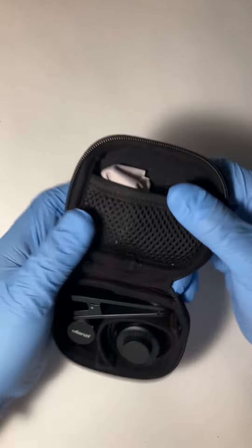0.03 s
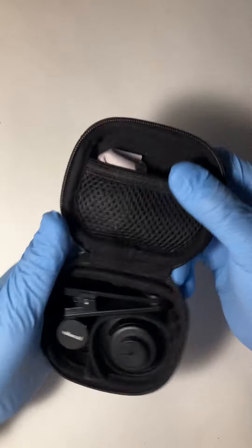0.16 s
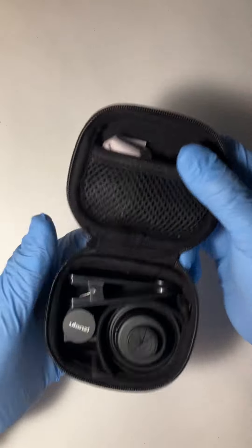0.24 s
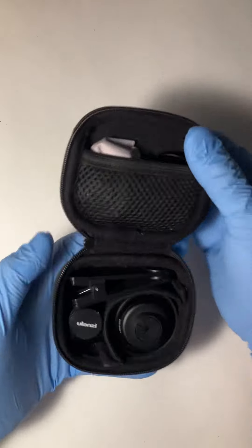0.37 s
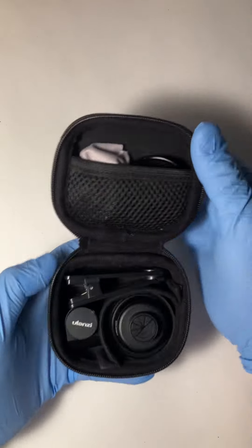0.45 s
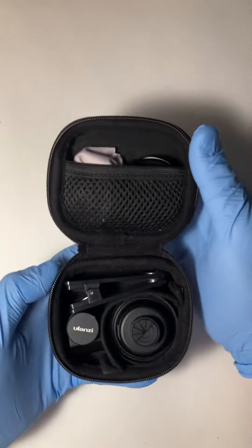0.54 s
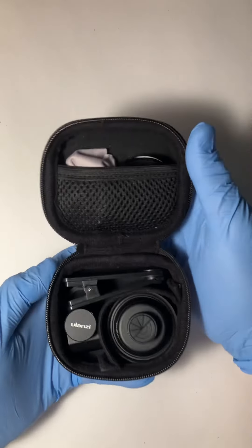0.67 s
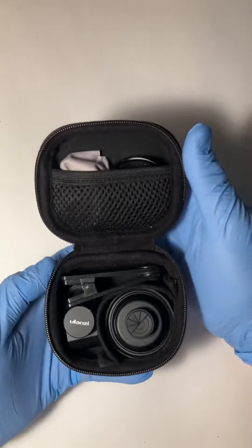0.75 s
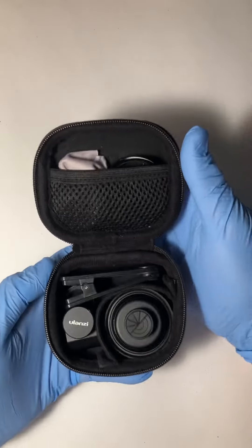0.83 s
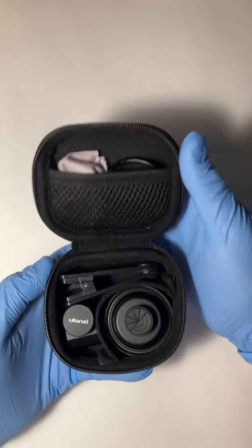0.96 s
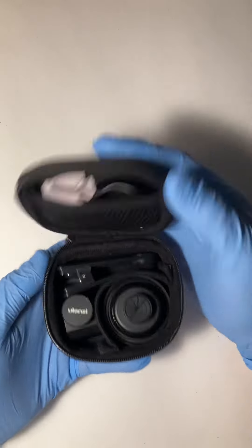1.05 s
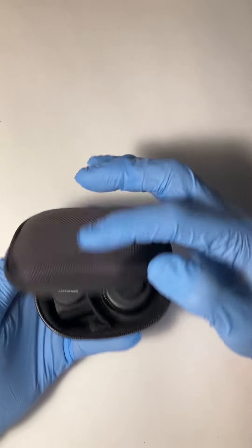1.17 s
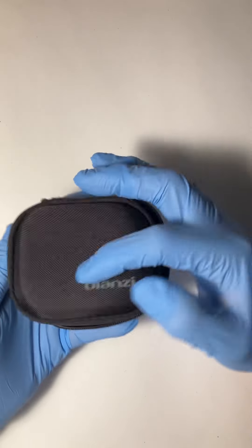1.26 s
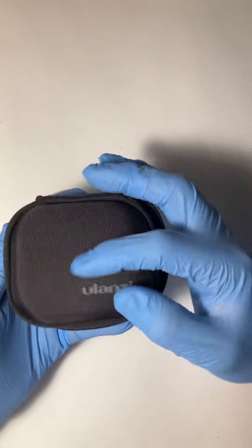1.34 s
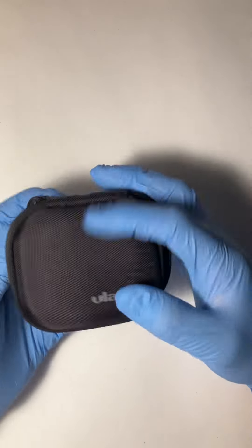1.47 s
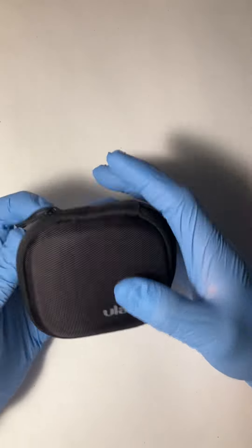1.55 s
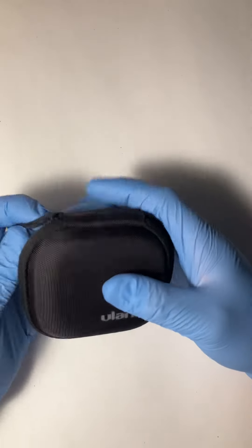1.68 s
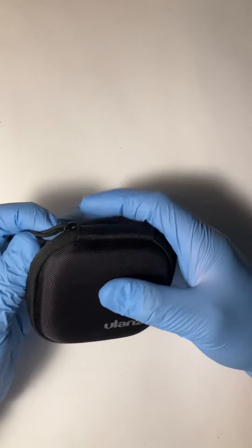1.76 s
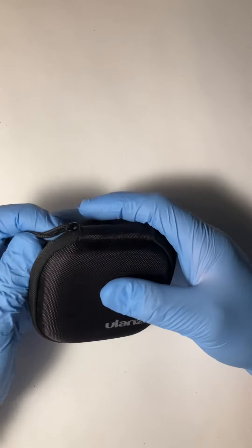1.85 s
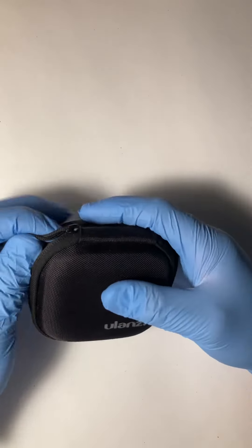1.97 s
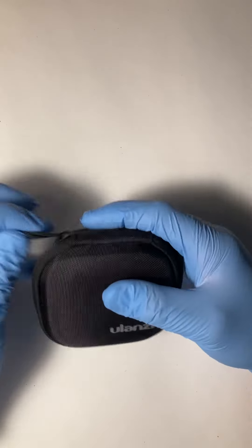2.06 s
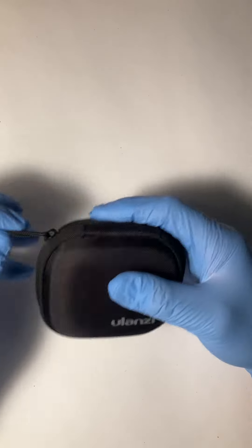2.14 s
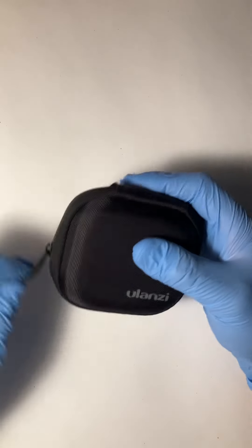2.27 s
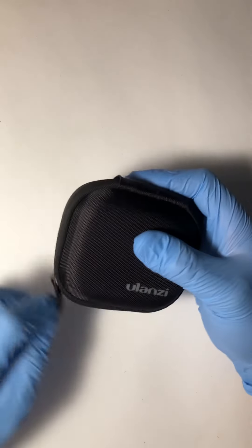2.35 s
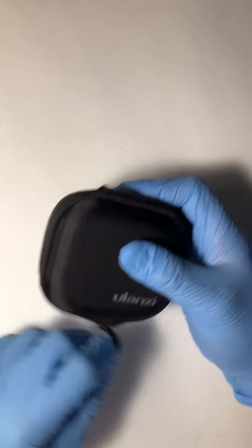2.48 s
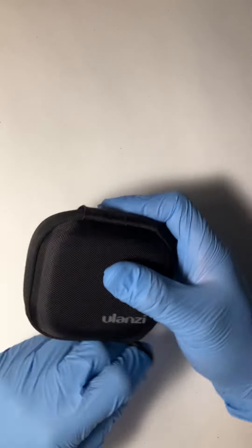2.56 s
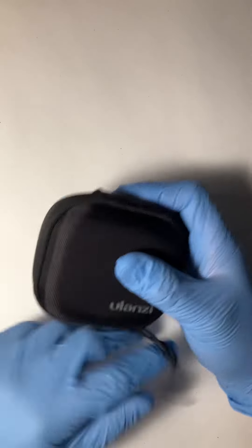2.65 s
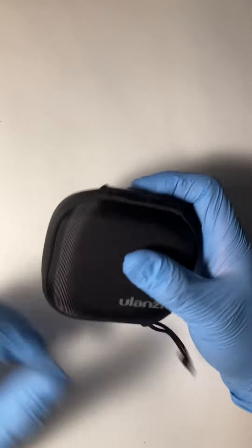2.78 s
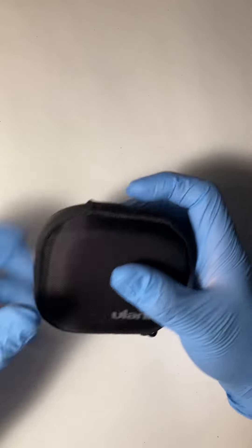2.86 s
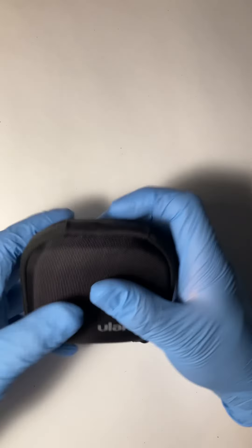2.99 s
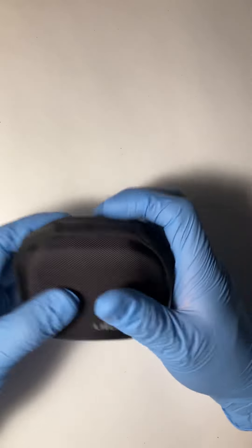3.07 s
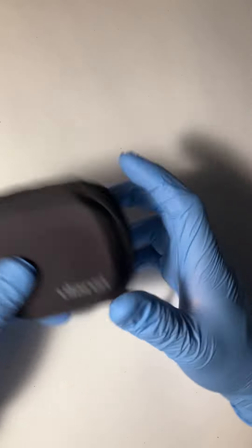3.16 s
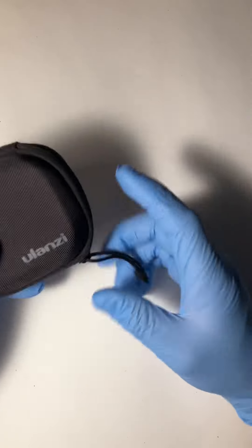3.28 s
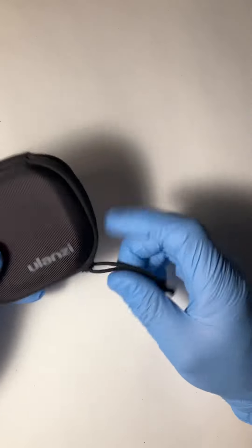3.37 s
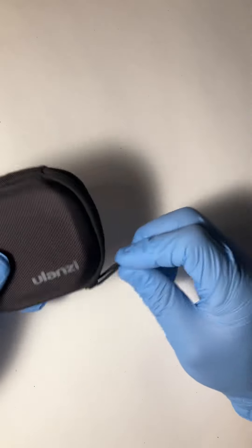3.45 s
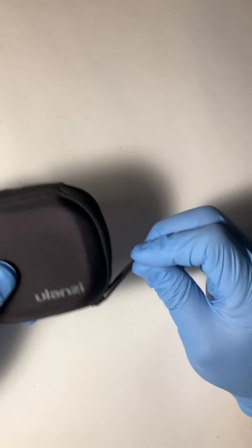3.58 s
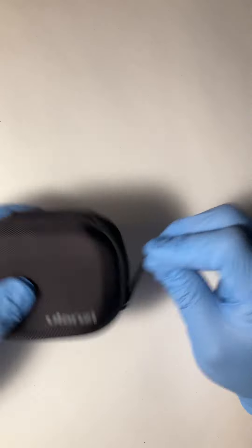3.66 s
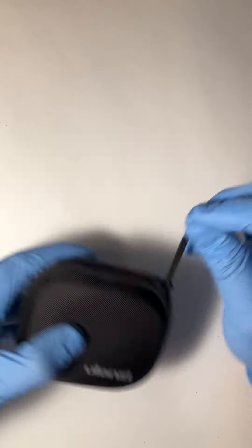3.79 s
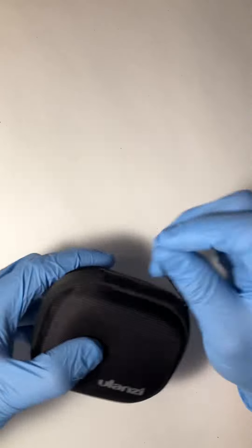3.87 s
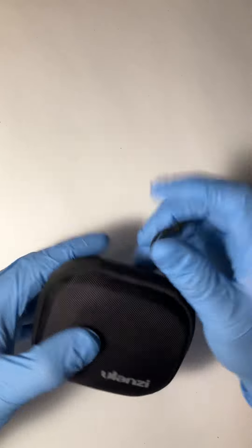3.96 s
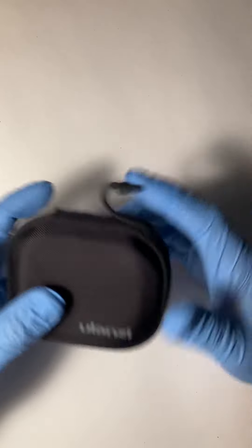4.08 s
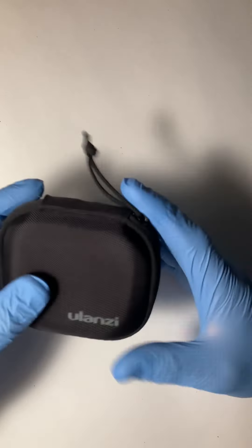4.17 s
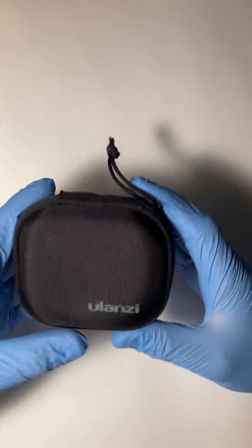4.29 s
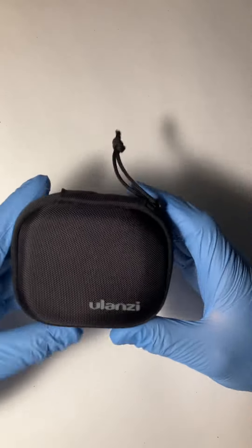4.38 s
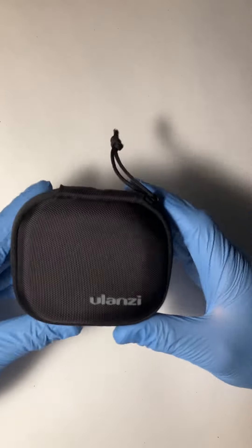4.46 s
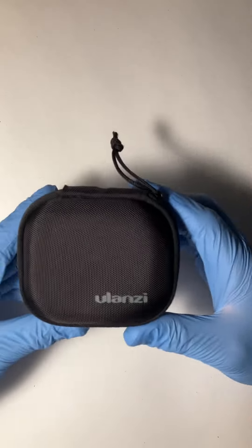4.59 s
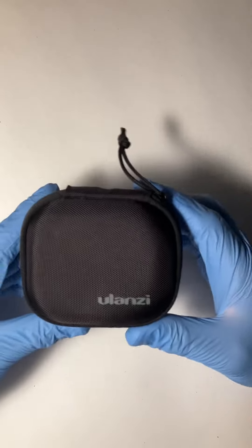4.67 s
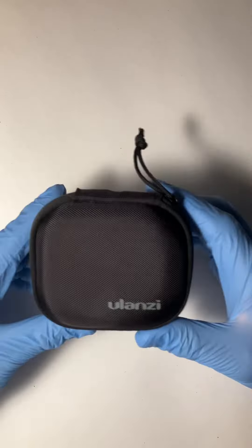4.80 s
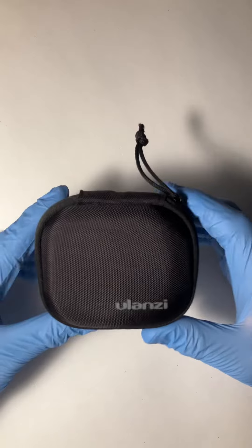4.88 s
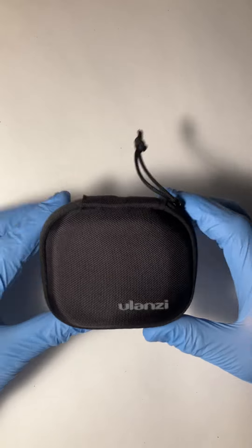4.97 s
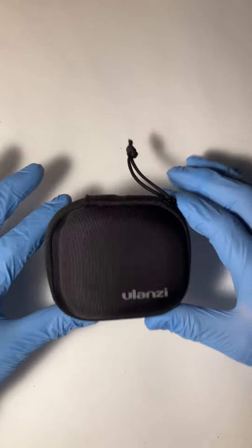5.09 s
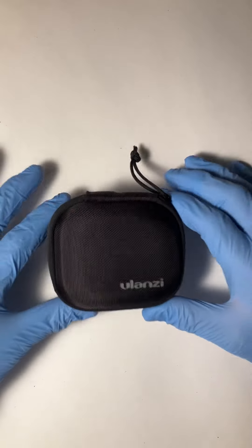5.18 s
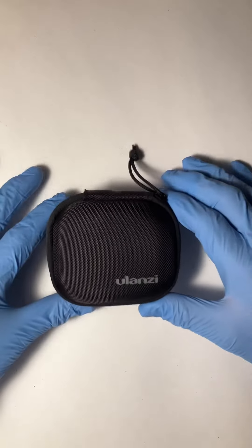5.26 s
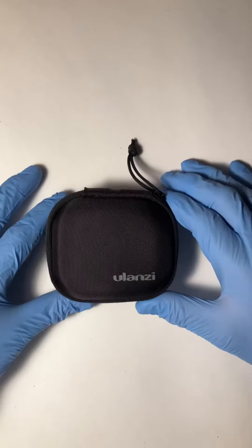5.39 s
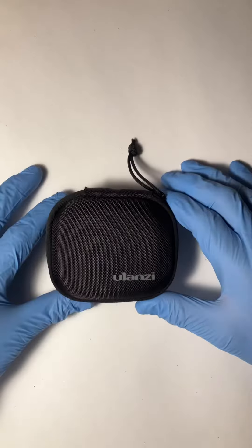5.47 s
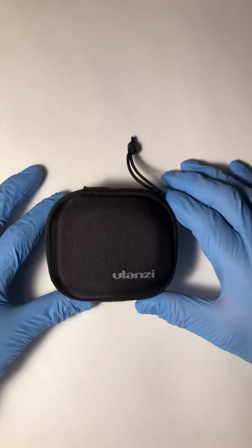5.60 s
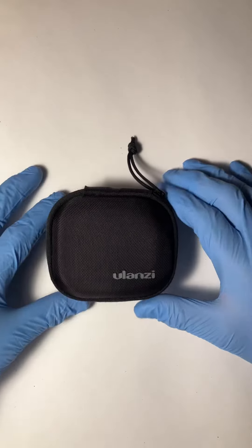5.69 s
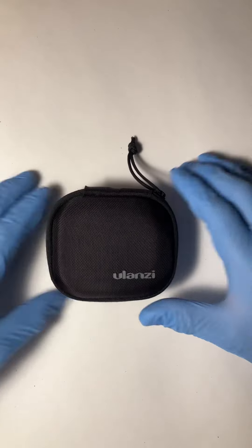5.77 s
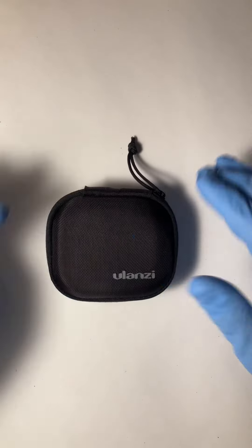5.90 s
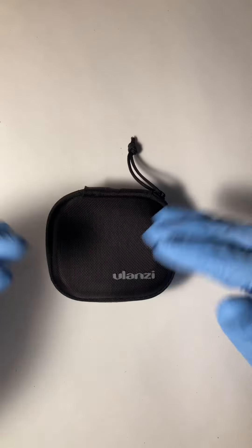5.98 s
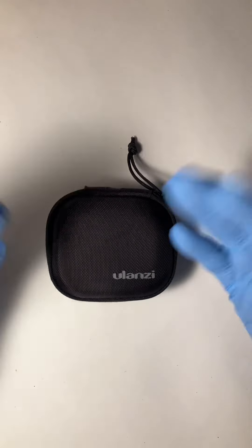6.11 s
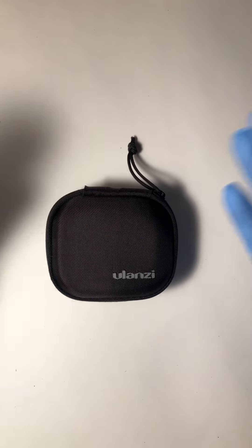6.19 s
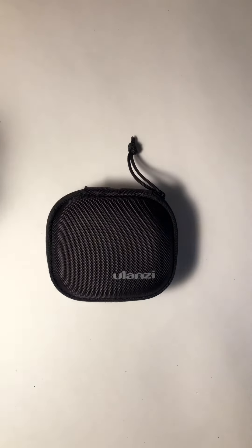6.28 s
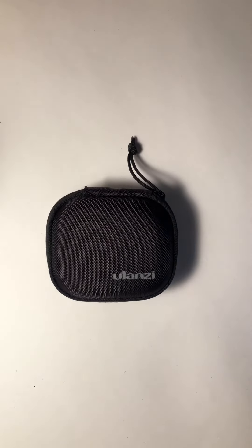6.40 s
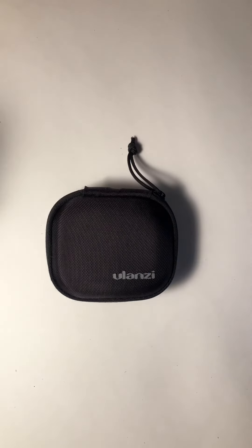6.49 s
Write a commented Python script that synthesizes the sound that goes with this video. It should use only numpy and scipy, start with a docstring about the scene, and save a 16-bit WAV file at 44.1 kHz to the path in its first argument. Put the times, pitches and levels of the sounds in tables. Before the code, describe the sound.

Stereo close microphones catch gloved fingers sliding on woven fabric, with crackles and tiny snaps. A zipper starts tooth by tooth and speeds into a hollow buzz; after a pause for handling, a faster burst and rattling tug finish the closing. The case then lands softly on a table. Low room rumble and a short diffuse echo surround it.

```python
"""A zipper on a small hard-shell fabric case: two pulls and a tug, each tooth clicking into the shell.
Gloved hands, heard as filtered friction, ticks and soft bumps, fold the case shut before the zipper
and set it on a table after it; that contact rings damped modes of case and table top.
Close by in a small room with a low rumble, through two microphone ports with a short diffuse echo."""
import sys
import numpy as np
from scipy import signal
from scipy.fft import rfft, irfft, next_fast_len
from scipy.io import wavfile

SR = 44100
rng = np.random.default_rng(int(sys.argv[2]) if len(sys.argv) > 2 else 0)


def transcribe(u):
    """Save the signal u as a 16-bit wav file named by the first command-line argument.

    u: samples, shape (n,) or (channels, n), limited to [-1, 1]; the rate is SR.
    q: integer samples, one column per channel.
    """
    v = np.clip(np.atleast_2d(u).T, -1, 1)
    q = np.round(v * 32767).astype(np.int16)
    wavfile.write(sys.argv[1], SR, q)


N = 288414
TIME = np.arange(N) / SR

# resonances of the shell: (f/Hz, width/Hz, lift/dB)
SHELL_MODES = [(481, 32, 6), (597, 7.9, 3.5), (694, 49, 1), (760, 90, 3.5), (925, 22, 3), (960, 31, 0.5),
               (1120, 15, 7), (1596, 110, 9.5), (1790, 98, 4.5), (2152, 180, 7), (2680, 89, 3),
               (3100, 210, -0.5), (4630, 500, 7.5)]
# resonances of the stiff rim that carries the teeth: (f/Hz, width/Hz, lift/dB)
RIM_MODES = [(1210, 73, 6.5), (1880, 240, 13.5), (3020, 520, 0), (4300, 620, 6.5)]
# broad colour of a single tooth or glove tick: (f/Hz, relative level per Hz/dB)
TICK_COLOUR = [(100, -14.5), (400, -17), (750, -1), (1250, -8.5), (1850, -12.5), (2450, -13.5), (3100, -8),
               (4200, -19), (5500, -19), (10000, -22.5), (15500, -25.5)]
# spectrum of a glove sliding on the weave: (f/Hz, relative level per Hz/dB)
SLIDING_COLOUR = [(800, -21), (2500, -10.5), (4000, -3.5), (5000, -4), (6800, -1), (9500, -1.25),
                  (13000, -4.5), (15800, -9)]

# length of the friction burst behind a slow tooth or a tooth of the long pull
TOOTH_GRIT_S = .0012


def from_db(db):
    """Decibels to gain."""
    return 10 ** (np.asarray(db) / 20)


def rms_one(x):
    """Scale to unit power."""
    return x / np.sqrt(np.mean(x ** 2) + 1e-20)


def at_hz(points, hz):
    """Read a table on a log-frequency axis."""
    known_hz, values = np.transpose(points)
    return np.interp(np.log(np.maximum(hz, 1)), np.log(known_hz), values)


def response(points, resonances=(), size=4096):
    """Causal minimum-phase impulse response of a broad spectrum with resonant peaks on it."""
    hz = np.arange(size // 2 + 1) * SR / size
    db = at_hz(points, hz)
    for centre, width, lift in resonances:
        db = db + lift / (1 + (2 * (hz - centre) / width) ** 2)
    cepstrum = irfft(np.log(from_db(db)))[:size // 2]
    cepstrum[0] /= 2
    return irfft(np.exp(rfft(2 * cepstrum, size)))[:size // 2]


def colour(x, points, resonances=()):
    """Filter so that a white input keeps its power."""
    h = response(points, resonances)
    return signal.oaconvolve(x, h / np.linalg.norm(h))[:N]


def drift(rate):
    """Smooth chance with spread 1, changing about rate times a second."""
    knots = rng.standard_normal(N // 8)
    return rms_one(np.interp(TIME * rate, np.arange(len(knots)), knots))


def curve(rows):
    """Each column of a table of (t/s, value, ..) joined by straight lines over time."""
    s, *columns = np.transpose(rows)
    return [np.interp(TIME, s, column) for column in columns]


def held(start, end, fade_s):
    """Full from start to end, fading quickly outside."""
    outside = np.maximum(start - TIME, 0) + np.maximum(TIME - end, 0)
    return np.exp(-np.minimum(outside / fade_s, 10) ** 2)


def swells(rows):
    """Rounded swells from rows of (peak t/s, half length/s, height), summed in power."""
    roundness, linger = 1.4, 0.99  # linger below 1: a swell dies a little faster than it grows
    power = np.zeros(N)
    for s, half_s, height in rows:
        near = slice(max(0, int((s - 5 * half_s) * SR)), int((s + 5 * half_s) * SR))
        age = (TIME[near] - s) / half_s
        distance = np.maximum(age / linger, -age * linger)
        power[near] += (height * np.exp(-distance ** roundness)) ** 2
    return np.sqrt(power)


def wander(x, depth_db, rate, lowest_hz=400):
    """As fingers or slider move over the shell, bands half an octave wide come and go on their own.

    All below lowest_hz moves as one band; what lies above the last edge stays steady.
    """
    size = next_fast_len(N)
    out, rest = 0, rfft(x, size)
    hz = np.linspace(0, SR / 2, len(rest))
    for edge in lowest_hz * np.sqrt(2) ** np.arange(8):
        low = rest / (1 + (hz / edge) ** 10)
        out = out + irfft(low, size)[:N] * from_db(depth_db * drift(rate))
        rest = rest - low
    return out + irfft(rest, size)[:N]


def gritty(clicks, grit, seconds):
    """Each click drags a short burst of friction noise behind it; the mean energy stays the same."""
    r = np.exp(-1 / (seconds * SR))
    burst = np.sqrt(signal.lfilter([1 - r], [1, -r], clicks ** 2 + 1e-24))
    return (clicks + grit * burst * rng.standard_normal(N)) / np.hypot(1, grit)


def friction(per_s, spread_db, smooth, flutter_db):
    """Threads catch and let go: dense slips of uneven size over a smooth hiss."""
    sizes = from_db(spread_db * np.clip(rng.standard_normal(N), -2, 2))
    slips = (rng.random(N) < per_s / SR) * rng.standard_normal(N) * sizes
    rough = rms_one(slips) + smooth * rng.standard_normal(N)
    return rms_one(rough * from_db(flutter_db * drift(110)))


def background(rumble_db, air_db):
    """Room rumble, about half of its power common to both ports, and a faint steady hiss in each."""
    # rumble over time: (t/s, relative level/dB)
    rumble_level = [(0, -76), (.5, -67.5), (.75, -61.5), (1.2, -65), (1.55, -60.5), (2.5, -57), (2.85, -71),
                    (3.0, -59.5), (3.25, -67), (3.8, -57.5), (4.6, -71.5), (5.2, -63.5), (5.8, -60.5),
                    (6.54, -63)]
    # rumble spectrum: (f/Hz, relative level per Hz/dB)
    rumble_colour = [(20, -35), (35, 3), (52, 9.5), (80, -1), (110, -5.5), (140, -9.5), (200, -21.5),
                     (300, -32), (600, -57.5), (2000, -72.5)]
    # hiss spectrum: (f/Hz, relative level per Hz/dB)
    air_colour = [(100, 19.5), (400, 6), (1000, -0.5), (3000, -5.5), (8000, -12), (15000, -18)]
    apart = 0.97  # each port's own rumble relative to the common one
    whites = rng.standard_normal(N) + apart * rng.standard_normal((2, N))
    rumble = np.array([colour(white, rumble_colour) for white in whites])
    rumble = rumble * from_db(rumble_db + curve(rumble_level)[0])
    air = np.array([colour(white, air_colour) for white in rng.standard_normal((2, N))])
    return rumble + from_db(air_db) * air


def touch():
    """Strength of hiss and of rub over time: the creep of the holding hands with the strokes on top."""
    # gloves hold the case and creep on it: (start t/s, end t/s, relative hiss/dB, relative rub/dB)
    holds = [(0, 0.735, -78.5, -72.5), (0.947, 1.706, -71.5, -64), (1.846, 2.563, -70, -57),
             (2.607, 3.097, -74, -65.5), (3.107, 3.314, -82.5, -74), (3.292, 5.043, -76.5, -74),
             (5.103, 5.268, -81.5, -80), (5.663, 6.161, -74.5, -78.5)]
    # a finger strokes the case: (peak t/s, half length/s, relative hiss/dB, relative rub/dB)
    strokes = [(0.084, 0.056, -54, -46), (0.109, 0.0087, -56, -40.5), (0.197, 0.16, -59, -53.5),
               (0.319, 0.023, -69, -51.5), (0.38, 0.021, -60.5, -69), (0.472, 0.049, -64, -64.5),
               (0.676, 0.037, -75.5, -57), (0.95, 0.028, -60.5, -89), (1.028, 0.06, -64, -86),
               (1.146, 0.017, -57, -62.5), (1.281, 0.0095, -56.5, -51.5), (1.319, 0.02, -60.5, -48.5),
               (1.422, 0.037, -54, -49), (1.513, 0.09, -57, -48.5), (1.694, 0.038, -65, -52),
               (1.866, 0.02, -85, -70), (1.93, 0.092, -61, -48.5), (1.99, 0.0057, -50.5, -38),
               (2.334, 0.1, -58.5, -39.5), (2.416, 0.022, -56, -67), (2.622, 0.025, -56.5, -51),
               (2.661, 0.029, -64.5, -81), (2.811, 0.029, -59, -72), (2.966, 0.023, -61, -51.5),
               (3.021, 0.028, -61.5, -52), (3.365, 0.016, -59, -70.5), (3.544, 0.058, -67, -53),
               (3.67, 0.069, -61.5, -42), (3.901, 0.034, -56.5, -56), (3.993, 0.059, -64.5, -76),
               (4.072, 0.035, -61, -59), (4.178, 0.021, -58.5, -57), (4.262, 0.06, -70.5, -59.5),
               (4.344, 0.017, -62, -55), (4.423, 0.11, -69.5, -66.5), (4.803, 0.047, -73.5, -70.5),
               (4.941, 0.1, -69.5, -74), (5.02, 0.078, -74, -71), (5.262, 0.034, -70, -80),
               (5.554, 0.11, -77.5, -87.5), (5.73, 0.033, -59.5, -61.5), (5.768, 0.024, -56, -66),
               (5.861, 0.07, -67, -66.5), (6.048, 0.034, -62, -75), (6.126, 0.032, -62.5, -74),
               (6.536, 0.05, -66, -75.5)]
    hiss = swells([(s, half_s, from_db(db)) for s, half_s, db, _ in strokes])
    rub = swells([(s, half_s, from_db(db)) for s, half_s, _, db in strokes])
    creep = from_db(2.5 * drift(74))  # the grip wavers: dB, changes per s
    for start, end, hiss_db, rub_db in holds:
        hold = creep * held(start, end, fade_s=.018)
        hiss = np.hypot(hiss, from_db(hiss_db) * hold)
        rub = np.hypot(rub, from_db(rub_db) * hold)
    return hiss, rub


def hands(sliding, pressing, slide_db, rub_db, shift_db):
    """Sliding hisses on the weave, pressing sounds the shell, shifting the case rumbles softly."""
    # spectrum of pressing fingers: (f/Hz, relative level per Hz/dB)
    rub_colour = [(150, -16.5), (400, -8), (700, 4.5), (1100, 5.5), (1600, -6), (2500, 2), (3800, -2),
                  (5500, -14), (10000, -16.5)]
    # the case shifts in the hands: (peak t/s, half length/s, relative level/dB)
    shift_times = [(0.004, 0.015, -53.5), (0.15, 0.039, -52.5), (0.47, 0.17, -68.5), (0.716, 0.021, -64),
                   (1.499, 0.07, -53), (1.743, 0.15, -56.5), (1.977, 0.056, -72), (2.586, 0.065, -56.5),
                   (2.967, 0.066, -53), (3.811, 0.042, -48), (4.14, 0.061, -59), (4.3, 0.079, -58.5)]
    # spectrum of shifting: (f/Hz, relative level per Hz/dB)
    shift_colour = [(30, -15), (70, 0.5), (130, -3.5), (200, -3.5), (280, -16), (450, -7.5), (900, -12.5),
                    (3000, -71)]
    slide = friction(per_s=6000, spread_db=1.5, smooth=0.83, flutter_db=1.5)
    slide = colour(slide, SLIDING_COLOUR)
    slide = rms_one(wander(slide, depth_db=1.0, rate=16, lowest_hz=1600))
    # fingers bring out the shell's resonances more than the slider does
    pressed_shell = [(hz, width, 1.4 * lift) for hz, width, lift in SHELL_MODES]
    rub = friction(per_s=2200, spread_db=5.5, smooth=.3, flutter_db=2.0)
    rub = colour(rub, rub_colour, pressed_shell)
    rub = rms_one(wander(rub, depth_db=3.8, rate=16))
    shift = colour(rng.standard_normal(N), shift_colour)
    shifting = swells([(s, half_s, from_db(db)) for s, half_s, db in shift_times])
    out = from_db(slide_db) * sliding * slide
    out += from_db(rub_db) * pressing * rub
    return out + from_db(shift_db) * shifting * shift


def wide_hiss(sliding):
    """A fainter layer of glove hiss, opposite in polarity at the two ports, widens the sliding."""
    hiss = colour(rng.standard_normal(N), SLIDING_COLOUR)
    return from_db(-15) * sliding * np.array([hiss, -hiss])


def crackle(pressing, level_db):
    """Rubber gloves stick and let go: small ticks in flurries, louder while the fingers press."""
    sizes = from_db(3 * np.clip(rng.standard_normal(N), -2, 1.5))
    rate = 70 * from_db(6 * drift(14))  # ticks per s, swinging by 6 dB some 14 times a second
    ticks = (rng.random(N) < rate / SR) * sizes * pressing
    return from_db(level_db) * colour(gritty(ticks, .6, 0.001), TICK_COLOUR, RIM_MODES)


def scuffs(level_db, width, grain_db):
    """Each scuff is a swell of friction that sounds the patch of hollow shell under the finger."""
    # (peak t/s, relative level/dB, half length/s, resonance f/Hz)
    finger_scuffs = [(0.022, -58, 0.069, 266), (0.061, -44, 0.0094, 1350), (0.075, -48, 0.038, 1065),
                     (0.082, -49, 0.067, 1620), (0.18, -62, 0.048, 1750), (0.192, -54.5, 0.037, 3430),
                     (0.274, -57, 0.0082, 970), (0.3, -62, 0.019, 2380), (0.437, -63, 0.06, 259),
                     (0.65, -61, 0.021, 1025), (1.167, -66, 0.016, 1130), (1.34, -65, 0.0095, 1170),
                     (1.387, -59, 0.023, 2320), (1.457, -60, 0.02, 1170), (1.532, -52.5, 0.01, 940),
                     (1.375, -59.5, 0.022, 1090), (1.776, -67, 0.03, 1160), (1.892, -54, 0.11, 774),
                     (1.932, -41.5, 0.0023, 1190), (1.933, -44, 0.0029, 577), (1.992, -54, .005, 920),
                     (2.973, -52.5, .004, 1270), (2.766, -68, 0.065, 468), (2.835, -68, 0.042, 806),
                     (2.989, -48.5, 0.0081, 230), (4.098, -62.5, 0.051, 730), (4.205, -61, 0.018, 746),
                     (4.272, -57.5, 0.037, 724), (4.375, -68, 0.047, 855), (4.51, -70, 0.066, 780),
                     (4.331, -69.5, 0.051, 2320), (4.488, -69.5, 0.12, 2430), (5.767, -64, .022, 3816),
                     (5.77, -76.5, 0.054, 1393), (5.866, -72, 0.014, 907), (5.954, -71, 0.019, 2210)]
    out, rub = np.zeros(N), friction(per_s=2700, spread_db=grain_db, smooth=0.49, flutter_db=2.0)
    for s, db, half_s, hz in finger_scuffs:
        near = np.abs(TIME - s) < 3 * half_s
        patch = signal.butter(1, [hz / (1 + width), hz * (1 + width)], "band", fs=SR, output="sos")
        swell = np.exp(-((TIME[near] - s) / half_s) ** 2)
        out[near] += from_db(db + level_db) * rms_one(signal.sosfilt(patch, rub[near])) * swell
    return out


def snaps(level_db, width, size=2048):
    """Glove rubber and pull cord let go with a tick of band noise that dies within milliseconds."""
    # (t/s, relative level/dB, pitch f/Hz, decay/s)
    small_snaps = [(.0645, -32, 1200, .003), (0.1102, -34, 1710, 0.0035), (.11, -28, 8900, .0016),
                   (0.2624, -41, 8550, 0.0027), (.401, -38, 7740, 0.0015), (0.41, -34, 9500, 0.0013),
                   (.555, -54, 3000, .002), (.638, -45, 1100, 0.004), (1.207, -51, 1500, .002),
                   (1.273, -41, 9000, 0.0036), (1.989, -40, 4470, 0.0035), (2.635, -48, 2200, .003),
                   (2.7078, -47, 7600, .0023), (2.799, -37, 7970, 0.0012), (2.8165, -45, 2640, .003),
                   (2.935, -43, 1800, 0.0035), (2.999, -39.5, 3100, .002), (3.108, -45, 2570, 0.003),
                   (3.1965, -39, 9500, 0.0013), (3.327, -57, 2500, .002), (3.438, -47, 8000, .001),
                   (3.921, -44, 1800, .004), (4.329, -49, 9500, 0.0038), (4.985, -52, 3000, .003),
                   (5.112, -53, 8500, .002), (6.109, -49, 2500, .003), (6.181, -44, 7750, 0.002)]
    rise_s = .0002
    out, age = np.zeros(N + size), np.arange(size) / SR
    for s, db, hz, decay_s in small_snaps:
        edges = [hz / (1 + width), min(hz * (1 + width), SR / 2 - 1000)]
        band = signal.butter(1, edges, "band", fs=SR, output="sos")
        tick = rms_one(signal.sosfilt(band, rng.standard_normal(size)))
        tick = tick * (1 - np.exp(-age / rise_s)) * np.exp(-age / decay_s)
        out[round(s * SR):][:size] += from_db(db + level_db) * tick
    return out[:N]


def bumps(level_db, rise_s, decay_s):
    """The hollow case knocks softly against the palm: a few low cycles that swell and die."""
    # as the lid shuts, the grip changes and the tug ends: (t/s, relative level/dB, pitch f/Hz)
    palm_bumps = [(1.472, -40.5, 110), (1.529, -52, 131), (2.979, -46, 233), (3.828, -39.5, 125),
                  (3.842, -53, 213)]
    out, age = np.zeros(N), np.arange(SR // 5) / SR
    envelope = (1 - np.exp(-age / rise_s)) * np.exp(-age / decay_s)
    for s, db, hz in palm_bumps:
        swing = np.sin(2 * np.pi * hz * age) * envelope
        out[round(s * SR):][:len(age)] += from_db(db + level_db) * swing
    return out


def slow_teeth(level_db, grit, grit_s, ring_db, ring_width_hz, size=512):
    """A slow slider jumps one tooth at a time; each jump rings the rim and the patch under it."""
    # (t/s, relative level/dB, ring f/Hz)
    single_teeth = [(1.929, -48, 1220), (2.008, -39, 1700), (2.0181, -32.5, 1100), (3.491, -39, 880),
                    (3.5176, -31, 1300), (3.5337, -28.5, 1150), (3.553, -30, 1210), (3.5692, -23.5, 3000),
                    (3.58, -21.5, 3100), (3.5877, -26.5, 3100), (3.718, -28.5, 1750), (3.7289, -27, 2050)]
    out, fade = np.zeros(N), np.exp(-np.arange(size) / (2 * grit_s * SR))
    for s, db, hz in single_teeth:
        scrape = rng.standard_normal(size) * fade / np.linalg.norm(fade)
        push = signal.unit_impulse(size) + grit * scrape
        ring = response(TICK_COLOUR, [*RIM_MODES, (hz, ring_width_hz, ring_db)])
        click = np.convolve(push, ring)
        out[round(s * SR):][:len(click)] += from_db(db + level_db) * click / np.linalg.norm(click)
    return out


def binding(force):
    """Where the slider binds and rasps, its clicks ring the patch of case that it has reached."""
    # (peak t/s, half length/s, lift against the plain buzz/dB, resonance f/Hz, width/Hz)
    rasps = [(2.028, 0.0088, 10, 990, 300), (2.052, 0.013, 2.5, 1550, 400), (2.08, 0.018, -24, 580, 158.8),
             (2.15, 0.052, -15, 2250, 300), (2.224, 0.0273, -12, 3360, 493), (2.336, 0.0233, -2, 660, 160),
             (2.342, 0.089, -8, 1130, 110), (2.367, 0.014, -4, 1740, 300),
             (2.402, 0.022, -4.5, 1130, 126.5), (2.422, 0.021, 8.5, 1950, 635),
             (2.457, 0.057, -10, 4250, 300), (2.47, 0.011, 2.5, 610, 148), (2.495, 0.021, 1.5, 2800, 1341),
             (2.499, 0.024, -0.5, 1720, 180), (2.528, .007, 0.5, 560, 183), (2.549, 0.0091, 3.5, 1970, 696),
             (3.595, .012, 1, 1800, 160), (3.615, .012, -4, 1170, 295.8), (3.615, .008, -4.5, 2900, 405.3),
             (3.646, .005, -1.5, 880, 248), (3.639, .007, -5, 1537, 346.4), (3.652, .005, 4.5, 1826, 300),
             (3.67, 0.0044, 1.5, 2650, 457), (3.751, 0.017, -5, 2320, 616)]
    out = np.zeros(N)
    for s, half_s, lift_db, hz, width_hz in rasps:
        near = np.abs(TIME - s) < 3 * half_s + .02
        push = force[near] * from_db(lift_db) * np.exp(-((TIME[near] - s) / half_s) ** 2)
        edges = [hz - width_hz / 2, hz + width_hz / 2]
        patch = signal.butter(2, edges, "band", fs=SR, output="sos")
        # make up for the power that a narrow band leaves out
        out[near] += signal.sosfilt(patch, push + 1e-18) * np.sqrt(SR / 2 / width_hz)
    return out


def zipper(pull, grip, wobble, uneven_db, grit, grit_s, split_hz, row_step_db=0):
    """One click per tooth into the shell: a rattle when slow, a rising buzz when fast."""
    start, end = pull[0][0], pull[-1][0]
    rate, db, bright_db = curve(pull)
    rate = rate * np.exp(wobble * drift(300))
    tooth = np.ceil(np.cumsum(rate * (TIME >= start)) / SR)
    strength = rms_one(from_db(uneven_db * rng.standard_normal(N)))
    # the two rows of teeth mesh in turn, one harder than the other
    strength = strength * from_db(row_step_db * (tooth % 2 - .5))
    # the root keeps the power independent of the rate
    clicks = np.diff(tooth, prepend=0) * np.sqrt(SR / rate) * strength
    # a fast slider skips from tooth to tooth and scrapes less
    force = gritty(clicks, grit * np.sqrt(250 / rate), grit_s)
    force = force * from_db(db) * held(start, end, fade_s=.003)
    # a taut chain gives harder contacts and more treble
    dull = signal.sosfilt(signal.butter(2, split_hz, fs=SR, output="sos"), force)
    sharp = signal.sosfilt(signal.butter(2, split_hz, "high", fs=SR, output="sos"), force)
    # minus, so that the two halves do not cancel where they cross
    return colour(dull - sharp * from_db(bright_db), grip, SHELL_MODES) + binding(force)


def pulls():
    """The slider goes round two sides, is pulled quickly along the last and tugged home."""
    # long pull, quick pull and short tug: (t/s, mean teeth per s, relative level/dB, treble/dB)
    long_pull = [(2.029, 117, -55.5, 6), (2.06, 139, -47.5, 6), (2.09, 197, -51, 3.5), (2.14, 229, -43, -5),
                 (2.215, 224, -41, 3), (2.275, 260, -38.5, -10.5), (2.34, 376, -33.5, -6.5),
                 (2.405, 580, -37.5, -4.5), (2.455, 440, -44, 12), (2.522, 370, -42, 10.5),
                 (2.542, 162, -41.5, 5), (2.56, 123, -43, 4.5), (2.572, 107, -47, 0)]
    quick_pull = [(3.594, 150, -37.5, 1.5), (3.607, 270, -35.5, -2), (3.622, 395, -32.5, -2),
                  (3.63, 470, -27.5, -2), (3.638, 555, -28, -1.5), (3.645, 640, -30.5, -2),
                  (3.652, 905, -28, 1), (3.66, 990, -34.5, 2.5), (3.669, 960, -34.5, 4),
                  (3.676, 830, -36, 2)]
    short_tug = [(3.7355, 158, -40.5, -9), (3.7485, 172, -37.5, -7), (3.756, 135, -36, -10),
                 (3.765, 115, -36.5, -7)]
    # broad colour of the shell as it is gripped: (f/Hz, relative level per Hz/dB)
    long_grip = [(60, -32.5), (170, -19), (300, -9), (430, -2.5), (560, -1), (720, 0.5), (1000, -12),
                 (1350, -20.5), (2100, -18), (2700, -23.5), (4200, -26.5), (5000, -35.5), (9000, -38),
                 (15500, -42.5)]
    quick_grip = [(60, -32.5), (150, -17), (260, -10.5), (480, -17.5), (750, -4), (1050, -9), (1400, -11.5),
                  (1900, -6.5), (2350, -19.5), (2900, -16), (4000, -25), (5200, -17.5), (10000, -23.5),
                  (15500, -27)]
    first = zipper(long_pull, long_grip, wobble=.11, uneven_db=1.5, grit=.55, grit_s=TOOTH_GRIT_S,
                   split_hz=1600, row_step_db=3)
    first = wander(first, depth_db=1.3, rate=30)
    second = zipper(quick_pull, quick_grip, wobble=0.01, uneven_db=3.0, grit=.4, grit_s=0.0011,
                    split_hz=2200)
    last = zipper(short_tug, quick_grip, wobble=0.025, uneven_db=3.0, grit=.4, grit_s=0.0027,
                  split_hz=880)
    return from_db(-2.0) * first + from_db(-1.0) * (second + last)


def spread(x, echo):
    """Waves run round the shell: all-pass loops smear each click over a few milliseconds."""
    g = np.clip(echo, 0, .8)
    for lag in (13, 23, 31):  # samples
        a = np.r_[1, np.zeros(lag - 1), g]
        x = signal.lfilter(a[::-1], a, x + 1e-18)
    return x


def landing(level_db):
    """The case meets the table edge, then settles; long soft contacts drive mainly the low modes."""
    # contacts: (t/s, relative strength/dB, contact time/s)
    contacts = [(5.272, -52.5, 0.00021), (5.2778, -35, 0.0044), (5.286, -27.5, 0.0086),
                (5.301, -38.5, 0.0055)]
    # case and table top ringing together: (f/Hz, relative level/dB, t60/s)
    table_modes = [(70, -13, 0.07), (86, -8.5, 0.04), (135, -11, 0.1), (160, -7, 0.03), (320, -1, 0.03),
                   (900, 6, 0.014), (1250, -1, 0.006), (1950, -17, 0.03), (2300, -3, 0.003),
                   (3200, -3, 0.004), (232, -9, 0.05), (560, -6, .03), (700, 5, .02), (880, -6, .055)]
    force, out = np.zeros(N), np.zeros(N)
    for s, db, contact_s in contacts:
        push = np.sin(np.pi * np.clip((TIME - s) / contact_s, 0, 1)) ** 2
        force += from_db(db + level_db) * push / (push.sum() + 1e-9)
    for hz, db, t60 in table_modes:
        r, w = from_db(-60 / (t60 * SR)), 2 * np.pi * hz / SR
        ring = signal.lfilter([0, np.sin(w)], [1, -2 * r * np.cos(w), r * r], force + 1e-18)
        out += from_db(db) * ring
    return out


def two_ports(x):
    """The close ports hear the same sound, the left one leading in phase by frequency."""
    # (f/Hz, lead of the left port/radians)
    port_phase = [(20, 0), (300, 0), (570, .1), (620, 2.4), (735, 2.6), (800, 1.4), (920, 1.2), (1150, .4),
                  (1650, .4), (2100, .8), (3000, 1), (4200, 1.6), (5000, 2.95), (5900, 3.35), (7200, 5.1),
                  (8700, 6.3), (10200, 7.6), (11200, 9.25), (12200, 9.6), (13200, 11), (15000, 12.6)]
    size = next_fast_len(N + 4096)
    lead = np.exp(1j * at_hz(port_phase, np.arange(size // 2 + 1) * SR / size))
    return np.array([irfft(rfft(x, size) * lead, size)[:N], x])


def room(x, gap_s, early, early_s, size=32768):
    """A diffuse tail, stronger at first, that dies octave by octave; alike at both ports in the bass."""
    # what the walls send back: (f/Hz, gain/dB)
    wall_colour = [(60, 5), (250, 2), (600, 1), (900, 1.5), (1300, -1), (2000, 0), (5000, -6),
                   (14000, -19.5)]
    # how long the tail rings: (f/Hz, t60/s)
    room_t60 = [(100, 0.42), (500, 0.32), (1000, 0.19), (2000, 0.17), (6000, 0.043), (14000, 0.044)]
    x = signal.oaconvolve(x, response(wall_colour))[:N]
    age, hz = np.arange(size) / SR, np.arange(size // 2 + 1) * SR / size
    shared, own = rfft(rng.standard_normal(size)), rfft(rng.standard_normal((2, size)))
    alike = 1 / (1 + (hz / 600) ** 2)
    diffuse = np.sqrt(alike) * shared + np.sqrt(1 - alike) * own
    tail = 0
    for low in 40 * 2 ** np.arange(9):
        octave = irfft(diffuse * ((hz >= low) & (hz < 2 * low)))
        tail = tail + octave * np.exp(-np.log(1000) * age / at_hz(room_t60, low * np.sqrt(2)))
    tail = tail * (age > gap_s) * (1 + early * np.exp(-age / early_s))
    return signal.oaconvolve(x[None], tail / np.linalg.norm(tail[0]), axes=1)[:, :N]


def scene():
    """Gloves, zipper and landing close to the two ports, their echo, and the room's own rumble."""
    sliding, pressing = touch()
    gloves = hands(sliding, pressing, slide_db=5.0, rub_db=-8.5, shift_db=-7.5)
    gloves += crackle(pressing, level_db=6.5)
    gloves += scuffs(level_db=-3.5, width=0.05, grain_db=0.5) + snaps(level_db=-9.0, width=0.13)
    single = slow_teeth(level_db=11.5, grit=.5, grit_s=TOOTH_GRIT_S, ring_db=6, ring_width_hz=500)
    case = gloves + spread(single + pulls(), echo=.38)
    thud = landing(level_db=7.0)
    direct = case + thud + bumps(level_db=1.5, rise_s=0.0063, decay_s=0.015)
    ports = two_ports(direct) + wide_hiss(sliding)
    outgoing = from_db(-11) * case + from_db(-16) * thud  # the palm bumps send no echo
    echo = room(outgoing, gap_s=.0049, early=2.5, early_s=.011)
    return ports + echo + background(rumble_db=-2.0, air_db=-74.0)


def record(dry):
    """The left port is shaded, most in the low mids; the deepest bass and the top are cut."""
    # (f/Hz, gain of the left port/dB)
    left_shade = [(60, -1.4), (250, -3), (500, -3), (600, 0), (670, -11), (740, -4.5), (820, -5.5),
                  (900, -1.8), (1100, -1.3), (2300, -1.5), (5000, -.4), (12000, 0)]
    left = signal.oaconvolve(dry[0], response(left_shade))[:N]
    bass_cut = signal.butter(6, 42, "high", fs=SR, output="sos")
    top_cut = signal.ellip(10, .1, 70, 15900, fs=SR, output="sos")
    return signal.sosfilt(top_cut, signal.sosfilt(bass_cut, [left, dry[1]]))


dry = scene()
out = record(dry)
transcribe(out)
```